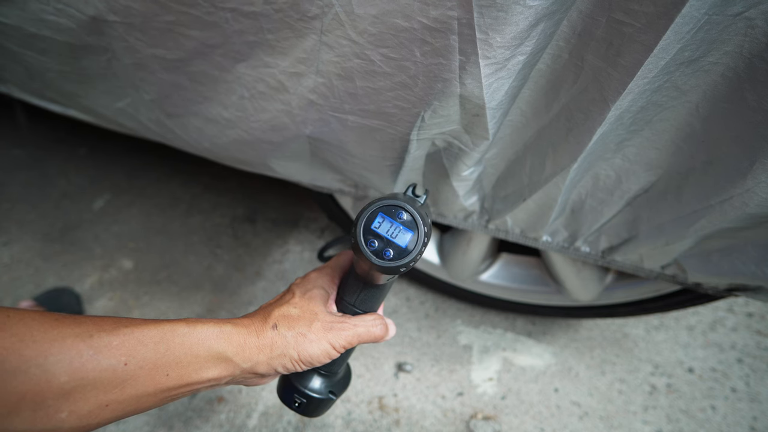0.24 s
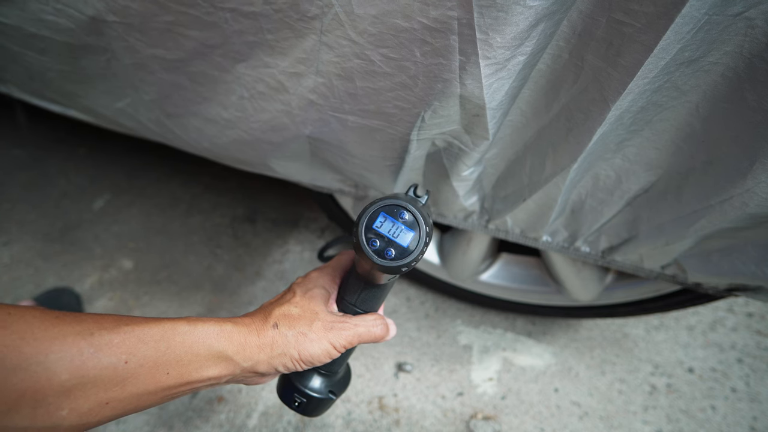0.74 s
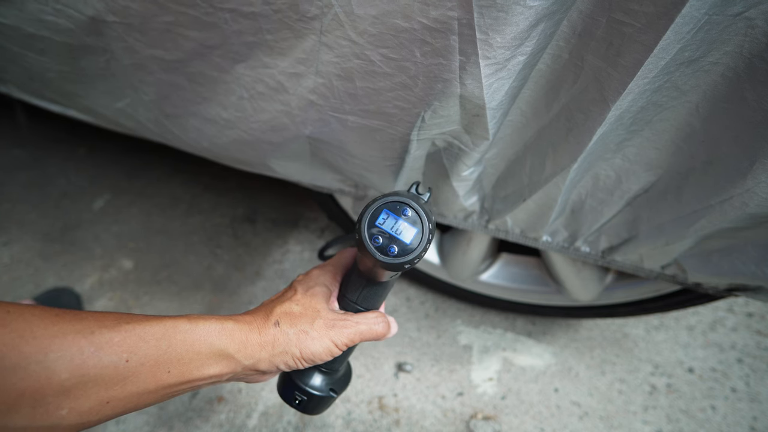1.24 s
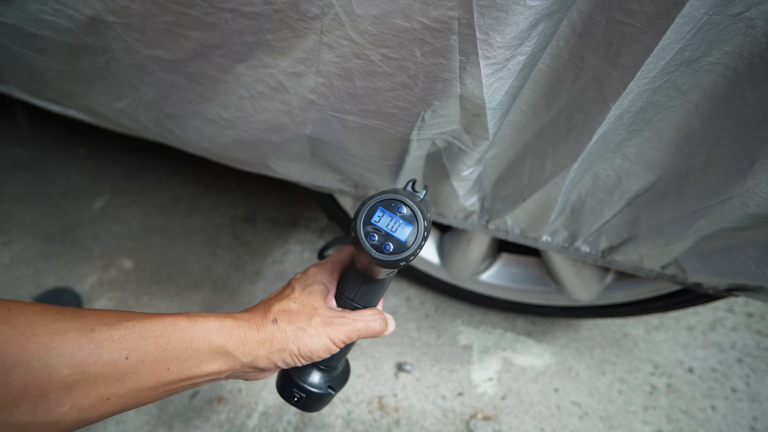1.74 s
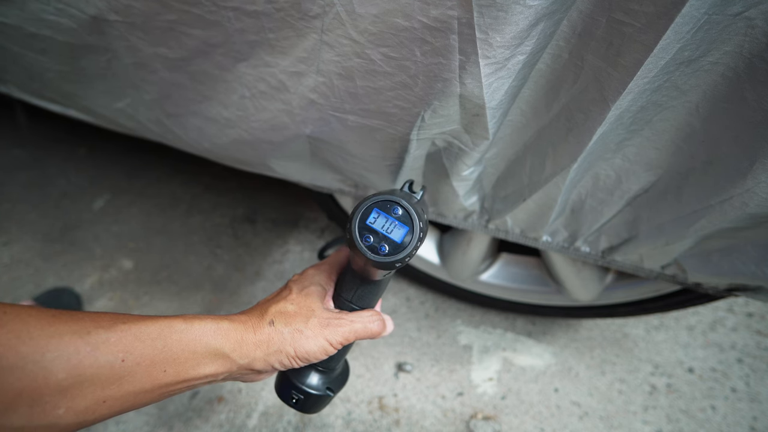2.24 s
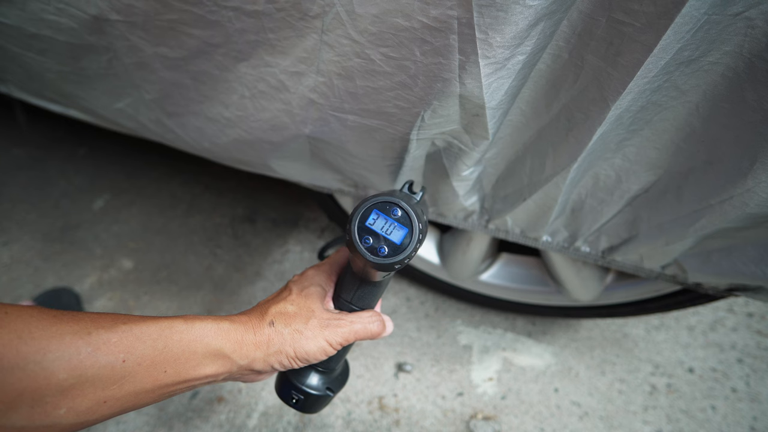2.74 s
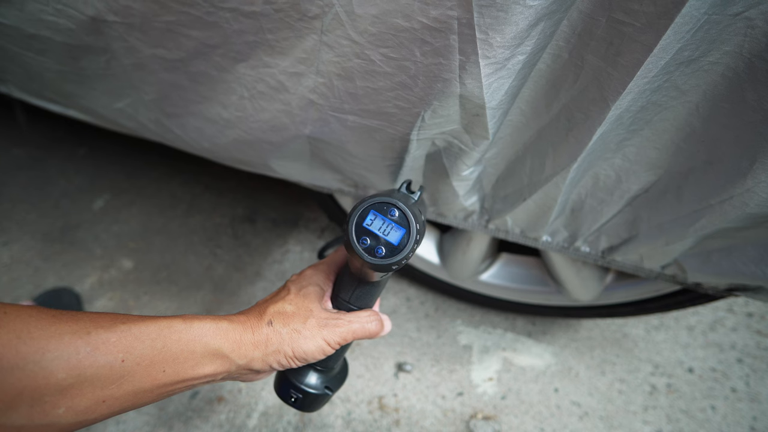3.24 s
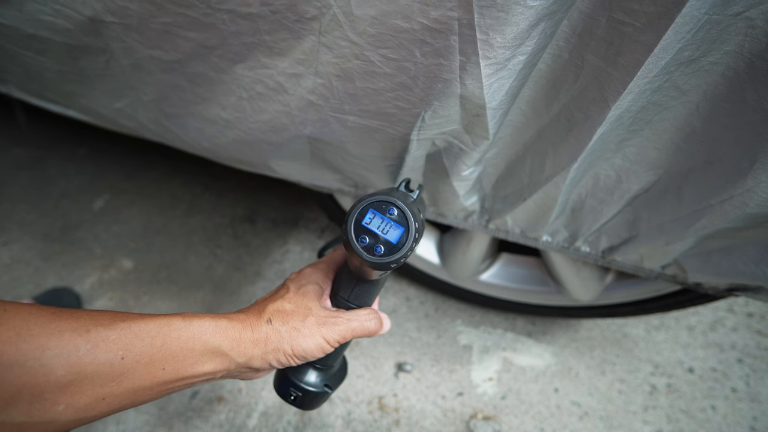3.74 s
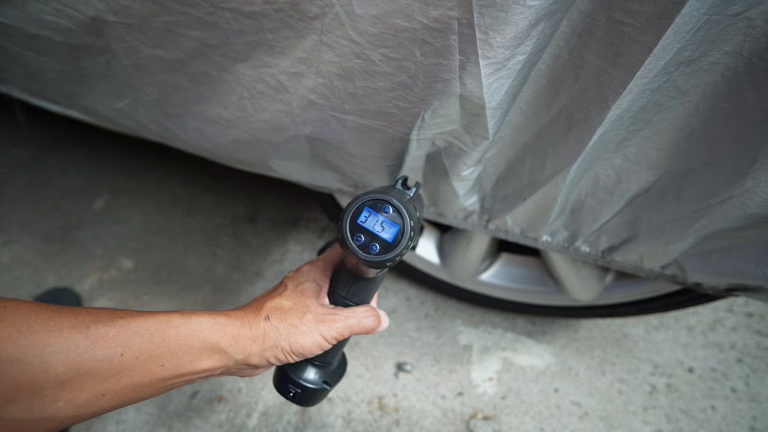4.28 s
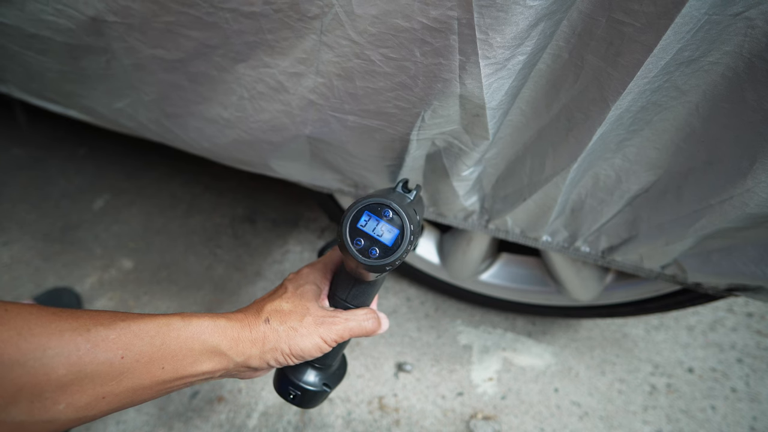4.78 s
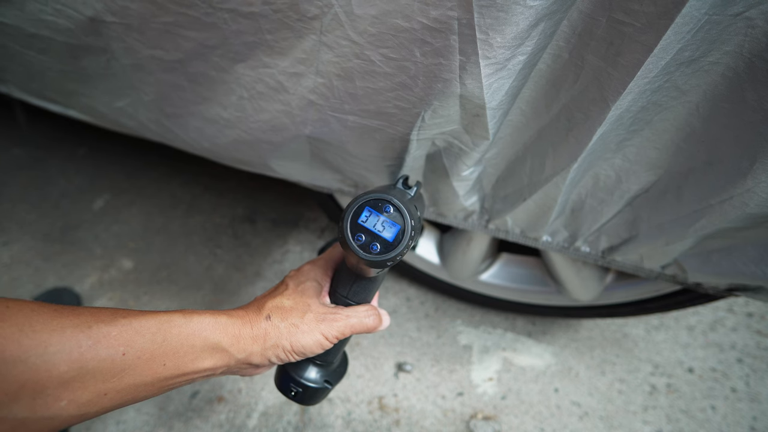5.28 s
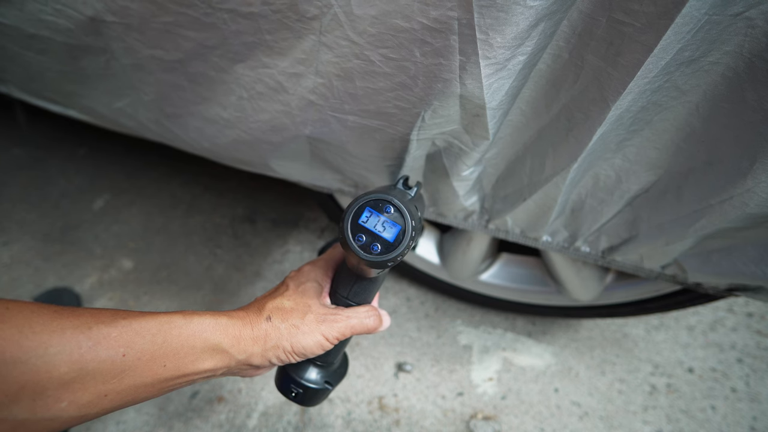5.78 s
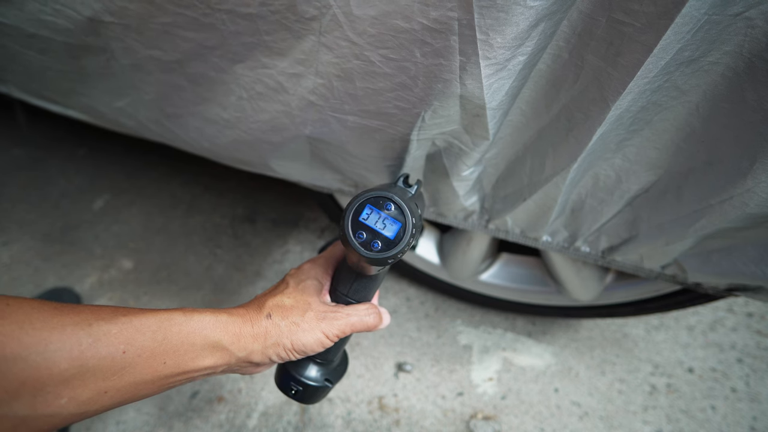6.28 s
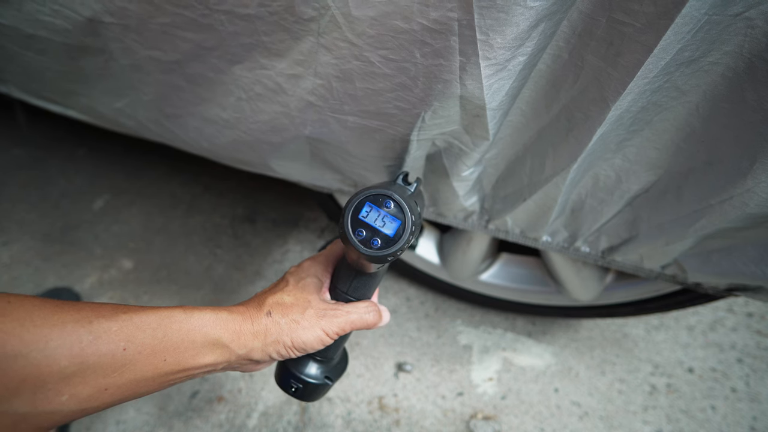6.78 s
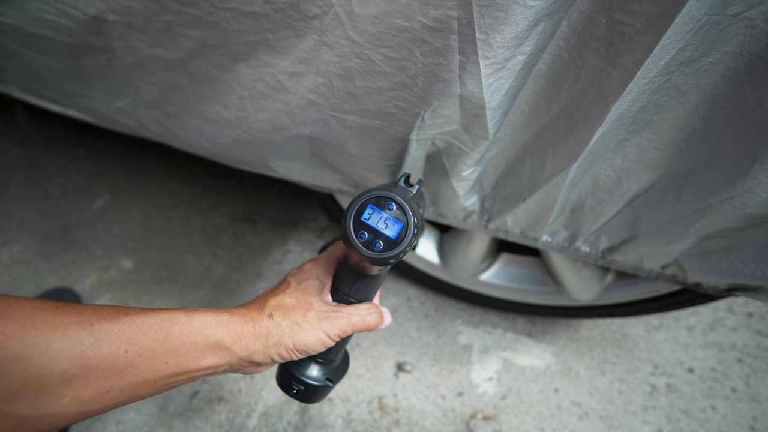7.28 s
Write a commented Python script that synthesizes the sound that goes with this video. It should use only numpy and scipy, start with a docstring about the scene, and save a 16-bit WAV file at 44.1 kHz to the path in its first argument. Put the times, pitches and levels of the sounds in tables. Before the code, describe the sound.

A small cordless tire inflator runs without pause, a hard buzzing rattle of fast piston strokes with a thin whine and steady air hiss.

```python
"""A hand-held cordless inflator pumps up a car tyre on a concrete drive at about fifty piston strokes a second.
On each crank turn the piston knock rings the cylinder; valve slaps and gear rattles ring the plastic housing.
The outlet valve chirps, air noise swells once per stroke, and steady noise makes the motor and gear whirr.
Sinusoids at multiples of the crank and motor rates make the hum and thin whine; concrete and car reflect.
A faint noise floor lies beneath."""
import sys
import numpy as np
from scipy import signal
from scipy.fft import rfft, irfft, next_fast_len
from scipy.io import wavfile
from scipy.ndimage import map_coordinates

SR = 44100
rng = np.random.default_rng(int(sys.argv[2]) if len(sys.argv) > 2 else 0)


def unload_audio(sound):
    """Save the sound as a 16-bit wav file, at the path given as the first command line argument."""
    columns = np.transpose(np.atleast_2d(sound))
    # keep every value between -1 and 1, then stretch to whole-number steps
    steps = np.round(np.clip(columns, -1, 1) * 32767)
    wavfile.write(sys.argv[1], SR, steps.astype(np.int16))


N = 331632
TIME = np.arange(N) / SR  # s
SIZE = next_fast_len(N + 8192, real=True)  # zero padding leaves room for ringing
FREQ = np.maximum(np.arange(SIZE // 2 + 1) * SR / SIZE, 1e-3)  # Hz, kept above zero
MOTOR_PER_CRANK = 4.8  # motor turns per crank turn


def undb(db):
    """Logarithmic level: decibels become an amplitude ratio."""
    return 10 ** (np.asarray(db) / 20)


def filtered(x, response):
    """Linear filtering: the spectrum is multiplied by a frequency response."""
    return irfft(rfft(x, SIZE) * response, SIZE)[:N]


def resonance(hz, width_hz):
    """Damped oscillator: the response of one mode, with gain 1 at its centre."""
    return 1 / (1 + 1j * (FREQ ** 2 - hz ** 2) / (FREQ * width_hz))


def mode_sum(modes, flip):
    """Modal superposition: mode k is weighted by flip ** k, so a negative flip alternates the signs."""
    response = 0
    for k, (hz, width_hz, db) in enumerate(modes):
        response = response + flip ** k * undb(db) * resonance(hz, width_hz)
    return response


def soft(edge_hz):
    """Finite contact time: a blow cannot shake anything much above its edge frequency."""
    return 1 / np.sqrt(1 + (FREQ / edge_hz) ** 6)


def white():
    """White noise: equal power in every hertz, at 0 dB per Hz."""
    return rng.standard_normal(N) * np.sqrt(SR / 2)


def noise(points):
    """Spectral shaping: white noise takes a density interpolated over log frequency."""
    hz, db = np.transpose(points)
    density_db = np.interp(np.log(FREQ), np.log(hz), db)
    return filtered(white(), undb(density_db))


def walk(knots_per_s):
    """Smooth random fluctuation: a spline through random knots, with a spread near 1."""
    knots = rng.standard_normal(1024)
    return map_coordinates(knots, [TIME * knots_per_s], order=3, mode="wrap")


def clicks(times, sizes):
    """Band-limited impulses: each pulse is a windowed sinc over eight samples, at an exact time."""
    at = times[:, None] * SR
    index = np.floor(at).astype(int) + np.arange(-3, 5)
    shape = np.sinc(index - at) * np.sinc((index - at) / 4)
    inside = (index >= 0) & (index < N)
    return np.bincount(index[inside], (sizes[:, None] * shape)[inside], N)


# Faint noise floor of each channel: (frequency [Hz], density [dB per Hz])
FLOOR_SPECTRUM = [(30, -150), (200, -134), (430, -118), (620, -128), (950, -119), (1700, -130),
                  (2350, -114), (3500, -121), (5600, -133), (7100, -121), (10500, -129), (12000, -118),
                  (14000, -115), (15500, -123)]


def noise_floor():
    """Incoherent noise: a faint floor, drawn separately for each channel."""
    return np.array([noise(FLOOR_SPECTRUM), noise(FLOOR_SPECTRUM)])


def car_echo(tool, level_db=-24, delay_s=0.004, hz=2500, width_hz=2500):
    """Specular reflection: the car's flank returns a faint, delayed, band-limited copy."""
    delay = np.exp(-2j * np.pi * FREQ * delay_s)
    return undb(level_db) * filtered(tool, resonance(hz, width_hz) * delay)


def ground(tool, bounce_db=-19, bounce_s=0.0039, drift_s=9e-5):
    """Comb interference: the concrete bounce drifts in delay, so single overtones swell and fade."""
    delay_s = bounce_s + drift_s * walk(0.79)
    bounced = filtered(tool, resonance(2300, 7500))
    return tool + undb(bounce_db) * map_coordinates(bounced, [(TIME - delay_s) * SR], order=3)


# Level of the housing's 2.4 kHz ring over time: (time [s], level [dB])
RING_LEVEL = [(0.0, -0.5), (0.85, 0.5), (1.1, -1.5), (1.4, 1.9), (2.1, 0), (3.3, 0.1), (4.7, -1.0),
              (6.1, -1.8), (7.52, 1.5)]


def slow_levels(tool, ring_hz=2370, ring_width_hz=350, treble_hz=2900, treble_fade_db_per_s=0.12, wander_db=0.2):
    """Amplitude modulation: slow level changes of the ring, the treble and the whole."""
    ring_gain = undb(np.interp(TIME, *np.transpose(RING_LEVEL)))
    treble_gain = undb(treble_fade_db_per_s * (np.mean(TIME) - TIME))
    ring = filtered(tool, np.abs(resonance(ring_hz, ring_width_hz)) ** 2)
    treble = filtered(tool, 1 - 1 / (1 + (FREQ / treble_hz) ** 8))
    balanced = tool + (ring_gain - 1) * ring + (treble_gain - 1) * treble
    return undb(wander_db * walk(2.58)) * balanced


# Mean crank speed under load, before hunting and wobble: (time [s], crank rate [Hz])
CRANK_SPEED = [(0.0, 50.236), (0.8, 50.031), (1.9, 50.059), (2.2, 50.11), (3.4, 50.268), (3.8, 50.002),
               (7.52, 50.019)]


def crank(start_turn=0.013, hunt_turns=0.0052, wobble_turns=0.0001):
    """Phase integration: speed sums to turns; the motor hunts and its off-centre pinion adds wobble."""
    mean_turns = start_turn + np.cumsum(np.interp(TIME, *np.transpose(CRANK_SPEED))) / SR
    turns = mean_turns + hunt_turns * walk(3)
    return turns + wobble_turns * np.sin(2 * np.pi * MOTOR_PER_CRANK * turns)


# Steady noise of brushes, gears and cooling air: (frequency [Hz], density [dB per Hz])
WHIRR_SPECTRUM = [(20, -122), (60, -109), (180, -110), (400, -114), (900, -109), (1500, -96), (2800, -96.5),
                  (3700, -98), (5400, -104), (7500, -107), (8300, -114), (11800, -123), (13800, -122),
                  (15500, -126)]


def whirr():
    """Broadband friction and flow noise: brushes, gears and cooling air share one steady spectrum."""
    return noise(WHIRR_SPECTRUM)


# Shaking of the tool by the piston, before its waver: (multiple of crank rate [1], level [dB rms])
SHAKE_ORDERS = [(1, -93), (2, -83.5), (3, -99), (4, -77.5), (5, -81.5), (6, -77), (7, -80.5), (8, -78.5),
                (9, -79)]
# Motor unbalance, then whine: (multiple of motor rate [1], level [dB rms])
MOTOR_ORDERS = [(1, -102.5), (31.65, -72)]


def hum(turns, waver_db=0.4, whine_blur_rad=0.5):
    """Order spectrum: rotating and reciprocating parts sound at multiples of shaft speed."""
    crank_angle = 2 * np.pi * turns
    shake = sum(undb(db) * np.cos(k * crank_angle) for k, db in SHAKE_ORDERS)
    whine_order = MOTOR_ORDERS[-1][0]
    motor_angle = MOTOR_PER_CRANK * crank_angle + whine_blur_rad * walk(45) / whine_order
    motor = sum(undb(db) * np.cos(k * motor_angle) for k, db in MOTOR_ORDERS)
    return np.sqrt(2) * (shake * undb(waver_db * walk(4.9)) + motor)  # rms to peak


# Air rushing through the valves, before the flow gain: (frequency [Hz], density [dB per Hz])
AIR_SPECTRUM = [(300, -126), (900, -116), (1250, -104), (2000, -106), (2400, -102), (2900, -106),
                (3800, -101), (5000, -106), (6150, -112), (7100, -105), (8300, -116), (10500, -119),
                (12000, -125), (15000, -126)]
# Narrow passages that whistle, before flow gain and mode weighting:
# (frequency [Hz], width [Hz], density [dB per Hz])
PORT_MODES = [(7150, 81, -102), (8900, 630, -112), (9960, 140, -117), (12700, 270, -118),
              (13900, 400, -118)]


def air(turns, flow_db=5, swing_db=3, peak_degrees=335, flutter_db=1.5):
    """Flow-modulated turbulence: air hisses hardest late in the stroke, while the outlet valve is open."""
    stroke_db = flow_db + swing_db * np.cos(2 * np.pi * turns - np.radians(peak_degrees))
    whistle = filtered(white(), mode_sum(PORT_MODES, 0.94))
    return (noise(AIR_SPECTRUM) + whistle) * undb(stroke_db + flutter_db * walk(40))


def strikes(turns, degrees, play_s, jitter_s, scatter_db):
    """Periodic impact: one blow per turn at a crank angle, with random time and force."""
    late, hard = rng.standard_normal((len(play_s), 2)).T
    times = np.interp(np.arange(len(play_s)) + degrees / 360, turns, TIME, left=-1, right=-1)
    return clicks(times + play_s + jitter_s * late, undb(scatter_db * hard))


def outlet(turns, play_s, degrees=240, chirp_db=-18.5, chirp_hz=4350, chirp_width_hz=300):
    """Impulsive excitation: compressed air forces the outlet valve open with a brief resonant chirp."""
    opening = strikes(turns, degrees, play_s, jitter_s=1.5e-5, scatter_db=0.7)
    return undb(chirp_db) * filtered(opening, resonance(chirp_hz, chirp_width_hz) ** 2)


def gear_beat(turns, beat_db=-0.04):
    """Amplitude modulation: the pinion meets each stroke in another position, so knock force varies."""
    return undb(beat_db * np.sin(2 * np.pi * MOTOR_PER_CRANK * turns))


def smeared(hz=1900, width_hz=900):
    """Dispersion: bending waves differ in speed, so an all-pass blunts the knock without colouring it."""
    return 1 - 2 * resonance(hz, width_hz)


# Cylinder modes, before mode weighting: (frequency [Hz], width [Hz], level [dB])
CYLINDER_MODES = [(578.5, 14.4, -7.5), (676.2, 64, -5.5), (896, 640, -29), (1506, 14, -5)]


def cylinder(turns, play_s, knock_hz=3600):
    """Modal ringing: the piston's knock excites the cylinder through a soft contact."""
    knock = strikes(turns, 0, play_s, jitter_s=1e-5, scatter_db=0.8)
    response = soft(knock_hz) * smeared() * mode_sum(CYLINDER_MODES, 0.88)
    return filtered(knock * gear_beat(turns), response)


# Valve slaps and gear rattles of one turn:
# (crank angle [degrees], level [dB], contact centre [Hz], contact width [Hz])
TURN_BLOWS = [(22.46, -18, 3370, 2800), (73.58, -23, 430, 16000), (152.83, -4.5, 2350, 350),
              (208.35, -2, 2502, 230), (218.94, -13, 7250, 3100), (255.8, -13.5, 6130, 1300),
              (271.89, -9, 1600, 3080), (298.5, -4.5, 1440, 604), (319.3, -9.5, 820, 415),
              (339.1, -13.5, 2900, 1330)]
# Plastic housing modes, before mode weighting: (frequency [Hz], width [Hz], level [dB])
HOUSING_MODES = [(983,122,-5.5), (1250.5,29.6,2.5), (1572,35,-6), (1831,56,-6.5), (1976,71,-9),
                 (2173,32,-2.5), (2367.3,52.5,-3), (2542.5,17,-5.5), (2703,120,-13.5), (3107,33,-5),
                 (3264,54,-7.5), (3587,19.5,7.5), (3580,228,-3), (3840,104,-5), (4230,92,-7.5),
                 (4686,93,-5.5), (4690,54,1), (4960,43,-11.5), (5230,190,-18.5), (5540,140,-21.5),
                 (6730,200,-11), (7180,187,-8), (6950,21,-23), (9000,160,-26), (1530,2100,-42),
                 (4460,1400,-8)]


def housing(turns, play_s, scrape=0.0053, scrape_s=0.0004, slap_hz=8300):
    """Forced modal response: slaps, each with a short noisy scrape, drive the housing modes."""
    scrape_tail = np.exp(-np.arange(512) / SR / scrape_s)
    force = 0  # summed as a spectrum
    for degrees, db, hz, width_hz in TURN_BLOWS:
        hits = strikes(turns, degrees, play_s, jitter_s=1.2e-5, scatter_db=0.55)
        scrape_envelope = signal.oaconvolve(hits, scrape_tail)[:N]
        hits = hits + scrape * scrape_envelope * rng.standard_normal(N)
        force = force + undb(db) * rfft(hits, SIZE) * resonance(hz, width_hz)
    return irfft(force * soft(slap_hz) * mode_sum(HOUSING_MODES, -1.0009), SIZE)[:N]


def pump(turns, backlash_s=1.4e-5):
    """Superposition and high-pass: the blows stay above 450 Hz; the hum carries the low orders."""
    play_s = backlash_s * rng.standard_normal(int(turns[-1]) + 2)  # backlash shifts a whole stroke
    blows = housing(turns, play_s) + cylinder(turns, play_s) + outlet(turns, play_s)
    return signal.sosfilt(signal.butter(2, 450, "high", fs=SR, output="sos"), blows)


def scene():
    """Stereo superposition: the tool a touch right of centre, its echo opposite in sign in the two channels."""
    turns = crank()
    tool = ground(slow_levels(pump(turns) + air(turns) + whirr())) + hum(turns)
    echo = car_echo(tool)
    left_gain, right_gain = undb([-0.14, 0.14])
    return np.array([left_gain * tool + echo, right_gain * tool - echo]) + noise_floor()


def record(dry, top_hz=15660):
    """Band limitation: a steep elliptic low-pass cuts the top."""
    return signal.sosfilt(signal.ellip(12, 0.1, 80, top_hz, fs=SR, output="sos"), dry)


dry = scene()
out = record(dry)
unload_audio(out)
```